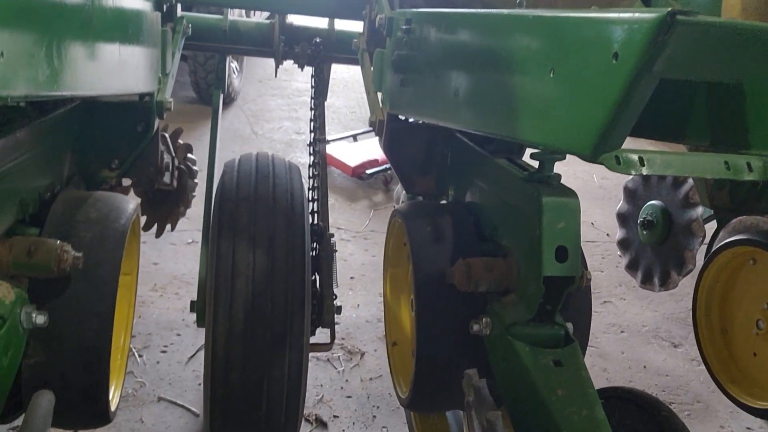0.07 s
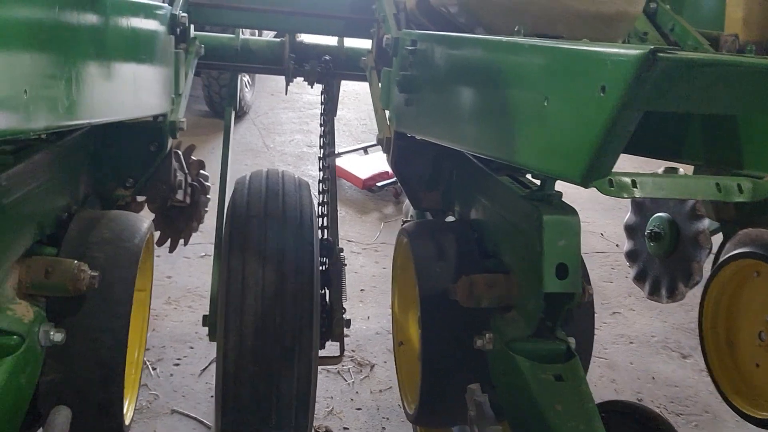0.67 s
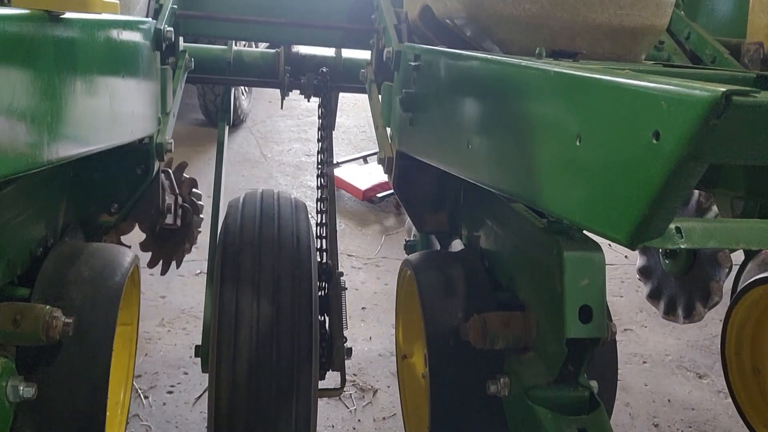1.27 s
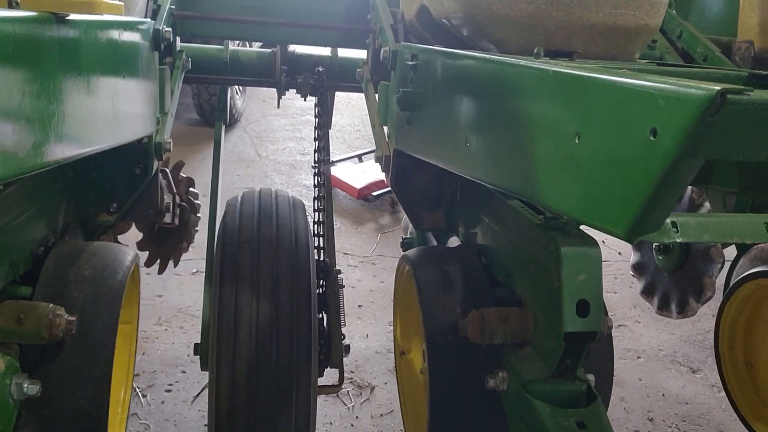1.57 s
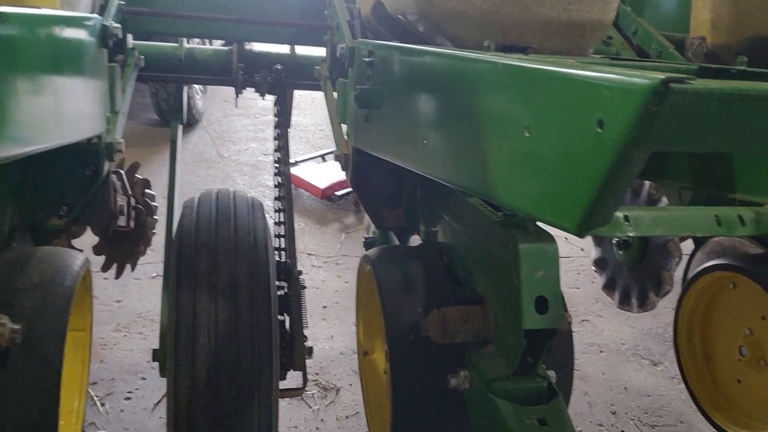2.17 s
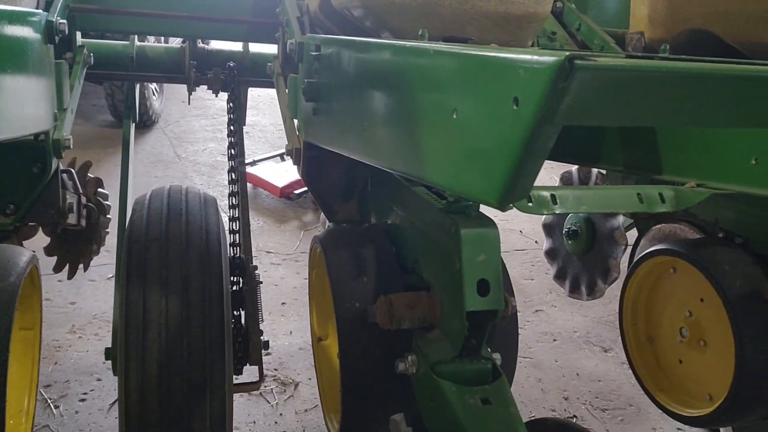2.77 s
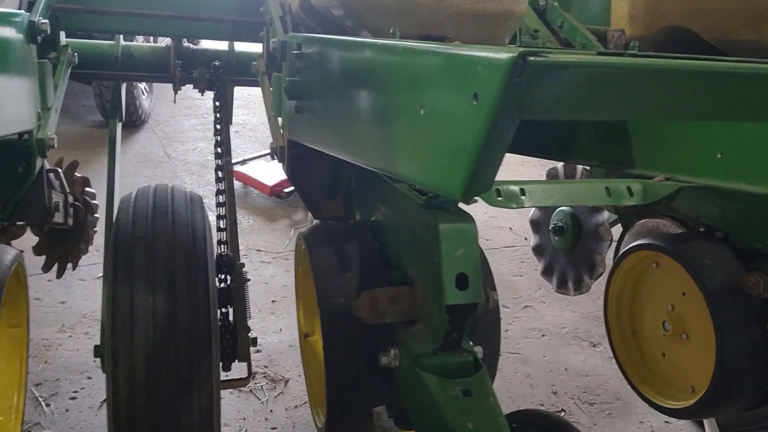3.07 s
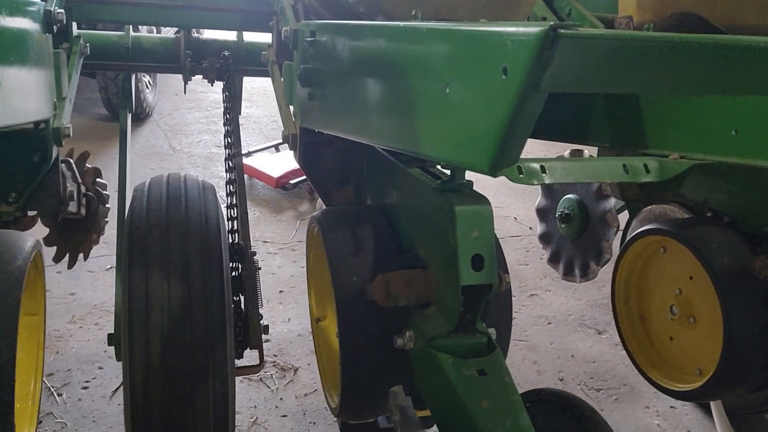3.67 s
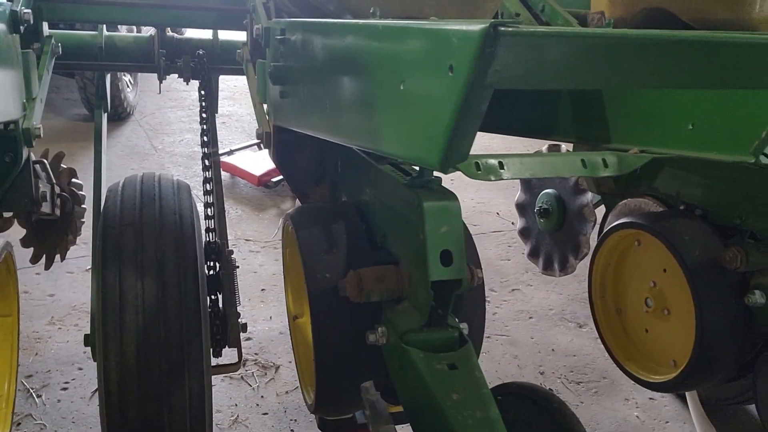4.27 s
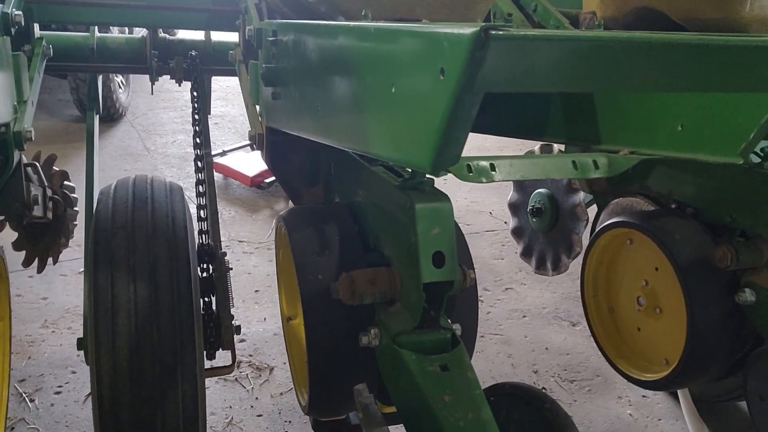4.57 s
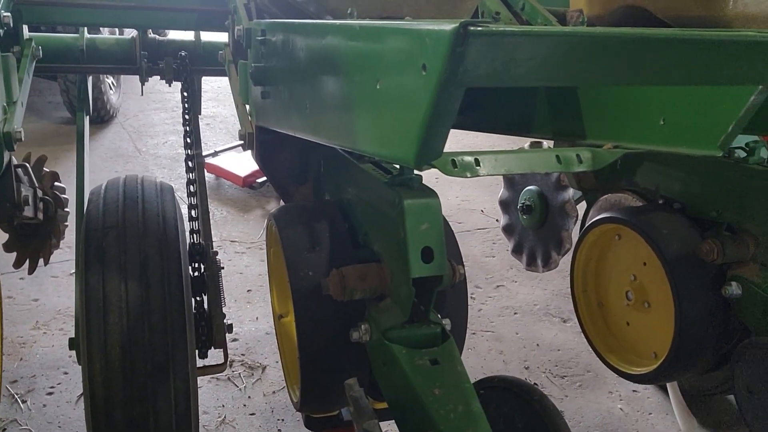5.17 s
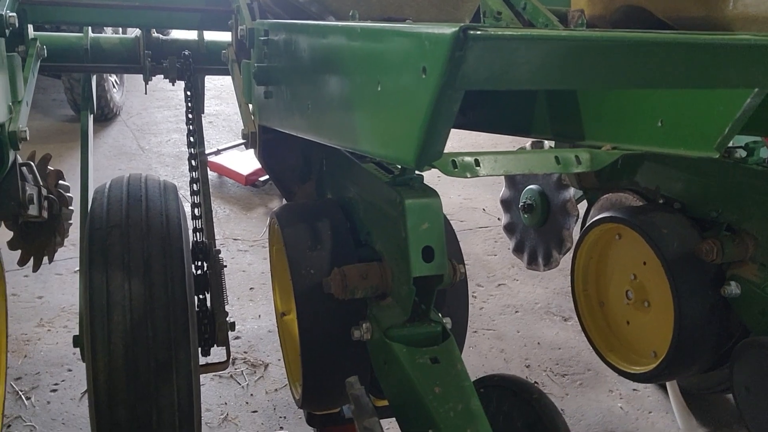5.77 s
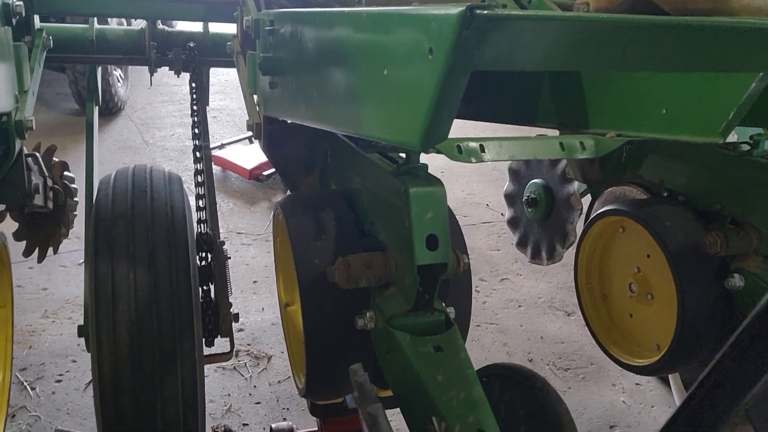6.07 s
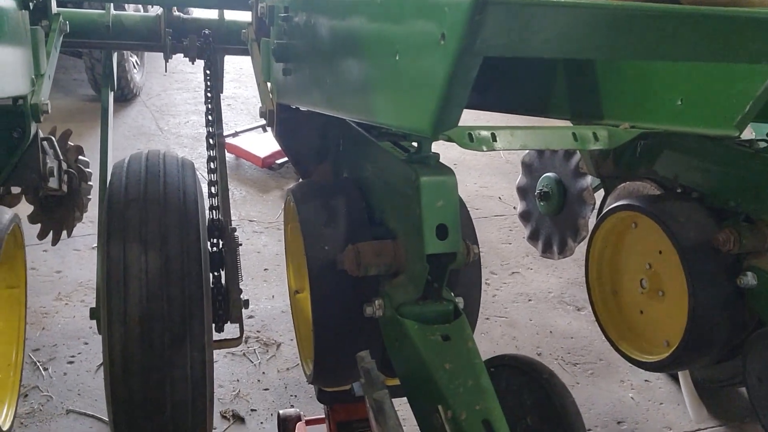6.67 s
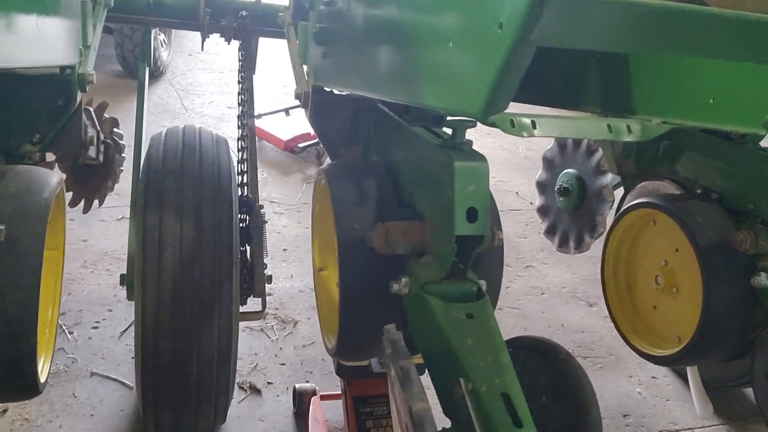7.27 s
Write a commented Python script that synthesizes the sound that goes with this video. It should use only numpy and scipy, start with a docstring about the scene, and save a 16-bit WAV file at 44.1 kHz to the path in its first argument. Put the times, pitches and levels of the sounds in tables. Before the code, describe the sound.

Shrill metal squeaks repeat about once a second among clanks and faint chain clicks, with a low rumble in a large indoor space.

```python
"""Row-crop planter turned over in a shed.

The planter is jacked up and its drive wheel and chain are turned slowly. A dry joint squeaks
by stick-slip about once a second. The steel frame clanks and bumps, discs and loose parts ring,
chain links click, and a grainy, scrape-like noise swells briefly. The large shed echoes, over
a low rumble of distant machinery."""
import sys
import numpy as np
from scipy import signal
from scipy.fft import rfft, irfft, next_fast_len
from scipy.io import wavfile

SR = 44100
rng = np.random.default_rng(int(sys.argv[2]) if len(sys.argv) > 2 else 0)


def dump(signal):
    """Clip the signal to [-1, 1] and save it as 16-bit WAV at the path in sys.argv[1]."""
    limited = np.clip(np.atleast_2d(signal).T, -1, 1)
    pcm = np.round(limited * 32767).astype(np.int16)
    wavfile.write(sys.argv[1], SR, pcm)


N = 322371
TIME_S = np.arange(N) / SR
SIDES = np.array([[1], [-1]])  # left, right

# Machinery spectrum. Each row: frequency in Hz, relative density in dB.
RUMBLE_SPECTRUM = [(21, -28.5), (36, 2.5), (75, 1.5), (107, -2.5), (186, -10), (222, -13), (332, -18.5),
                   (497, -24.5), (536, -22), (1110, -32.5), (1470, -32), (2760, -56), (4580, -58.5),
                   (8610, -68.5), (15000, -70.5)]
# Stereo width of the rumble. Each row: frequency in Hz, side over mid in dB.
RUMBLE_WIDTH = [(100, -16), (180, -14.5), (350, -10), (700, -1.5), (2000, 2), (10000, 1)]
# Motors. Each row: frequency in Hz, relative start level in dB, fade in dB per second, end in seconds.
MOTOR_HUMS = [(101.9, -52, 1.5, 6.5), (130.9, -56.5, -0.14, 7.3)]
# Shed reverberation. Each row: frequency in Hz, T60 in seconds.
SHED_DECAY = [(100, 3.1), (500, 0.42), (2000, 0.59), (5000, 0.38), (10000, 0.56), (16000, 0.093)]
# Hiss, and brief swells of grainy noise. Each row: start in seconds, length in seconds, relative dB.
HISS_SPELLS = [(0.984, 0.813, -75), (4.25, 0.36, -83)]
NOISE_SWELLS = [(3.076, 0.41, -71), (4.241, .31, -56.5), (4.912, 0.597, -66)]
# Spectra of hiss, grainy noise and impact contacts. Each row: frequency in Hz, gain in dB.
HISS_SPECTRUM = [(1500, -18), (4400, 7), (6000, -8), (10000, -5), (12000, -5), (15500, -8)]
GRAIN_SPECTRUM = [(200, -0.5), (550, 5), (1500, -2), (2400, -1), (3500, -6.5), (5000, -10),
                  (7000, -24), (15000, -46.5)]
CLANK_SPECTRUM = [(100, -1.5), (380, -9), (850, 1), (1800, -2.5), (3300, 0), (4900, -1), (7500, -14),
                  (15000, -22.5)]
BUMP_SPECTRUM = [(100, 2.5), (380, 0.5), (850, 11.5), (1600, -1), (3300, -10), (4900, -20), (7500, -37),
                 (15000, -52.5)]
# Chain pins seating. Each row: time in seconds, pitch in Hz, level in dB.
PIN_CLINKS = [(0.38, 3610, -67), (0.587, 3600, -77), (1.236, 3460, -61.5), (3.419, 3260, -72),
              (5.146, 3400, -67), (5.713, 3334, -61), (6.16, 3280, -69.5), (6.878, 3300, -69.5),
              (7.117, 2750, -71.5)]
# Pin modes. Each row: multiple of the pitch, gain in dB, T60 in seconds.
PIN_MODES = [(0.571, -2.5, 0.12), (1, -0.5, 0.12), (1.032, -11, 0.043), (1.6, -14, 0.16),
             (1.719, -28.5, 0.083), (2.2, -17, 0.035)]
# Loose parts. Each row: time in seconds, centre frequency in Hz, level in dB, T60 in seconds.
PART_KNOCKS = [(2.37, 240.3, -43.5, 0.39), (2.370, 745, -33, 0.039), (3.206, 1075, -51.5, 0.1),
               (3.554, 1507, -29.5, 0.036), (4.387, 388, -43, 0.076), (5.266, 1420, -43, 0.11),
               (6.306, 1427, -43.5, 0.085)]
# Frame shudders and blows that ring the discs. Each row: time in seconds, level in dB.
FRAME_SHUDDERS = [(0.65, -33), (0.7, -33), (0.786, -31.5), (4.152, -39)]
DISC_STRIKES = [(0.68, -48), (0.80, -33), (3.556, -47)]
# Disc modes. Each row: frequency in Hz, gain in dB, T60 in seconds.
DISC_MODES = [(540, -6.5, 0.46), (1210, -29.5, 0.87), (1400, -11, 0.14), (1783, -1.5, 0.66),
              (2060, -11.5, .4), (2430, -12, .33), (2820, -20, 0.17), (3750, -18, 0.18), (4240, -29, 0.51),
              (4500, -37, .33), (4770, -10, 0.17), (6340, -22.5, 0.16)]
# Main frame resonances. Each row: frequency in Hz, width in Hz, lift in dB.
FRAME_RESONANCES = [(556, 10, 9.5), (1104, 41, 2.5), (1432, 65, 6.5), (2020, 140, 6), (2283, 160, 5.5),
                    (3140, 23, -1.5), (3850, 72, 4.5), (4330, 26, 1), (4760, 250, 2), (5600, 68, 8.5),
                    (7940, 130, 11.5), (11860, 200, 10)]
# Steel on steel. Each row: time in seconds, relative level in dB, tilt in dB per octave,
# extra bass in dB, chatter T60 in seconds.
STEEL_CLANKS = [(0.677, -28.5, -1.5, -1.5, .035), (0.698, -42, -3, -14, .12), (0.747, -42.5, -3, -3.5, .1),
                (0.789, -31, 1.5, 1.5, 0.0099), (0.796, -32.5, -1.04, -0.5, .06),
                (0.839, -30.5, 1.73, 6, .045), (0.938, -53, -3, 7.5, .18), (3.555, -37.5, -5.5, -21, .05),
                (4.151, -41, -4, -2, .05), (4.161, -40, 2, 3, .025)]
# Drive taking up slack. Each row: time in seconds, relative level in dB, tilt in dB per octave,
# extra bass in dB.
SLACK_BUMPS = [(0.586, -55.5, 1.5, -0.5), (2.14, -54, 2, -7), (2.24, -65, -9, 0.5), (2.367, -42, -2.5, 6.5),
               (2.614, -60, 0, 4), (2.642, -52.5, 1, -3), (2.676, -51.5, 5.5, -2.5), (3.113, -55, -1, -5),
               (3.205, -50.5, -6, -10.5), (3.264, -49, 0.5, -0.5), (3.285, -64.5, 5, 6.5),
               (4.227, -54, -2.5, -5), (4.581, -61, 1, 0.5), (4.986, -58.5, 3.5, 5.5), (5.039, -51, 4, 3.5),
               (5.197, -51.5, 6, 3.5), (5.263, -50, -4.5, -8.5), (6.304, -53.5, -9.5, -24)]
# Squeak overtones as the frame radiates them. Each row: frequency in Hz, relative gain in dB.
OVERTONE_SPECTRUM = [(7200, -19.5), (7800, -14), (9000, -34.5), (10300, -28), (11500, -28), (13500, -33.5),
                     (15500, -31)]
# Dry joint. Each row: start in seconds, length in seconds, first and last pitch in Hz,
# relative level in dB, fade in dB, roughness (0 is smooth).
JOINT_SQUEAKS = [(2.768, 0.22, 5443, 5024, -34.5, 2.5, 0.27), (2.98, 0.04, 4887, 4706, -38, 6, 0.45),
                 (3.153, 0.037, 5490, 5950, -39, -3, 0.43), (3.674, 0.075, 4630, 4480, -55, 10, 0.54),
                 (3.701, 0.095, 4224, 3764, -44, -0.5, 0.5), (3.793, 0.12, 3718, 3603, -40.5, 12.5, 0.03),
                 (4.721, .032, 4660, 4440, -41.5, 15.5, .3), (4.73, 0.035, 4150, 4056, -42.5, 0, 0.42),
                 (4.754, 0.04, 4914, 4733, -27.5, 6, 0.3), (4.792, 0.084, 4557, 4460, -31, -0.5, 0),
                 (4.87, .105, 4435, 4350, -40.5, 7, 0.25), (5.12, 0.042, 5370, 5580, -48, 14, 0.38),
                 (5.708, 0.038, 5120, 4860, -42.5, 9.5, 0.7), (5.748, 0.033, 4890, 4727, -30.5, 6.5, .4),
                 (5.77, 0.18, 4670, 4379, -31, 12.5, 0.2), (5.87, 0.045, 5080, 5150, -61.5, 13, .7),
                 (5.878, 0.073, 3810, 3630, -48, 6.5, 1.01), (5.936, 0.077, 3650, 3578, -45.5, 12.5, 0),
                 (6.883, .1, 5320, 4980, -45.5, 10, 0.23)]


def undb(db):
    """Decibels to gain."""
    return 10 ** (np.asarray(db) / 20)


def unit(x):
    """Scale to rms 1."""
    return x / np.sqrt(np.mean(x ** 2))


def along(points, hz):
    """Interpolate (Hz, value) points in log frequency."""
    point_hz, value = np.transpose(points)
    return np.interp(np.log(np.maximum(hz, 1)), np.log(point_hz), value)


def colour(x, db_at):
    """Filter by a dB gain given as a function of Hz."""
    n = next_fast_len(x.shape[-1])
    gain = undb(db_at(np.fft.rfftfreq(n, 1 / SR)))
    return irfft(rfft(x, n) * gain, n)[..., :x.shape[-1]]


def wander(rate_hz, n):
    """Smooth random motion, spread near 1."""
    at = np.arange(n) * rate_hz / SR
    return np.interp(at, np.arange(n), rng.standard_normal(n)) * np.sqrt(3 / 2)


def swell(t, length_s, rise_s, fall_s):
    """Trapezoid envelope."""
    return np.clip(np.minimum(t / rise_s, (length_s - t) / fall_s), 0, 1)


def pan(left_db):
    """Constant-power stereo gains, left over right."""
    return unit(undb(SIDES * left_db / 2))


def noise_pair(n, apart):
    """Two noises sharing all but the fraction `apart` of their power."""
    return np.sqrt(1 - apart) * rng.standard_normal(n) + np.sqrt(apart) * rng.standard_normal((2, n))


def add(out, start_s, sound):
    """Mix a sound in."""
    i = max(int(start_s * SR), 0)
    out[:, i:i + sound.shape[-1]] += sound[..., :N - i]


def rumble(level_db=-49, throb_hz=19, drone_hz=535, drone_width_hz=22):
    """Distant machinery drones and throbs: bass centred, upper range diffuse."""
    def shape_db(f):
        drone_db = 6 / (1 + (2 * (f - drone_hz) / drone_width_hz) ** 2)
        return along(RUMBLE_SPECTRUM, f) + 1.5 * f / (f + 3000) + drone_db

    mid = colour(rng.standard_normal(N), shape_db)
    side = colour(rng.standard_normal(N), lambda f: shape_db(f) + along(RUMBLE_WIDTH, f))
    air = (mid + side * SIDES) / np.std(mid) * undb(level_db + wander(4.3, N))
    throbbing = colour(air, lambda f: along([(150, -15), (400, -19)], f))
    return air + 0.12 * np.sin(2 * np.pi * throb_hz * TIME_S) * throbbing


def motors(gain_db=-1, waver_db=2, die_s=1.5):
    """Two motors hum, waver and die away."""
    out = np.zeros(N)
    for hz, db, fade_db_per_s, end_s in MOTOR_HUMS:
        phase = 2 * np.pi * np.cumsum(hz + 0.6 * wander(10, N)) / SR
        running = np.clip((end_s - TIME_S) / die_s, 0, 1)
        level_db = db + gain_db - fade_db_per_s * TIME_S + waver_db * wander(4.4, N)
        out += np.sqrt(2) * np.sin(phase) * running * undb(level_db)
    return out


def shed(x, tail_db, near_db, near_s, build_s=0.033):
    """Add quick reflections from nearby panels and the hall's diffuse tail, dull at its end."""
    t, f = TIME_S[:SR], np.fft.rfftfreq(SR, 1 / SR)
    spectrum, tail = rfft(rng.standard_normal((2, SR))), 0
    bands_hz = np.geomspace(100, 16000, 8)
    for hz, weights in zip(bands_hz, np.eye(len(bands_hz))):
        band = irfft(spectrum * along(np.c_[bands_hz, weights], f), SR)
        tail = tail + band * undb(-60 * t / along(SHED_DECAY, hz))
    tail = unit(tail * (1 - np.exp(-t / build_s))) / np.sqrt(SR)
    taps = rng.standard_normal((2, SR)) * (rng.random((2, SR)) < 0.02)
    near = unit(taps * np.exp(-t / near_s) * (t > 0.001)) / np.sqrt(SR)
    echoes = undb(near_db) * signal.fftconvolve(x, near, axes=1)[:, :N]
    echoes += undb(tail_db) * signal.fftconvolve(x.mean(axis=0)[None], tail, axes=1)[:, :N]
    # long waves arrive alike at both ears
    side = colour((echoes[0] - echoes[1]) / 2, lambda f: along([(150, -11), (1200, 2.5)], f))
    return x + echoes.mean(axis=0) + side * SIDES


def hiss(gain_db=-1, fade_s=0.17):
    """Thin hiss lingers after the big clanks."""
    level = sum(undb(db + gain_db) * swell(TIME_S - start_s, length_s, fade_s, fade_s)
                for start_s, length_s, db in HISS_SPELLS)
    noise = colour(noise_pair(N, apart=1), lambda f: along(HISS_SPECTRUM, f))
    return pan(left_db=3) * unit(noise) * level


def frame_lift_db(f):
    """Summed lift of the frame's main resonances."""
    return sum(db / (1 + (2 * (f - hz) / width_hz) ** 2) for hz, width_hz, db in FRAME_RESONANCES)


def grainy_noise(floor_db=-74.5, gain_db=-3, grain_db=4, waver_db=2):
    """Brief swells of grainy, scrape-like midrange noise over a faint floor."""
    white = noise_pair(N, apart=1)
    noise = unit(colour(white, lambda f: along(GRAIN_SPECTRUM, f) + 0.15 * frame_lift_db(f)))
    swells = sum(undb(db) * swell(TIME_S - start_s, length_s, rise_s=0.08, fall_s=0.083)
                 for start_s, length_s, db in NOISE_SWELLS)
    grains = undb(gain_db + grain_db * wander(250, N) + waver_db * wander(19, N))
    return noise * (undb(floor_db) + swells) * grains


def pins(buzz_rad=0.29):
    """Chain pins drop onto their seats and buzz briefly."""
    out, t = np.zeros((2, N)), TIME_S[:SR // 4]
    for start_s, hz, db in PIN_CLINKS:
        for multiple, mode_db, t60_s in PIN_MODES:
            phase = 2 * np.pi * hz * multiple * t + buzz_rad * wander(600, len(t))
            add(out, start_s, pan(left_db=2) * np.sin(phase) * undb(db + mode_db - 60 * t / t60_s))
    return out


def loose_parts(mode_spacing=0.09):
    """Each knocked part rings on three close, heavily damped modes."""
    out, t = np.zeros((2, N)), TIME_S[:SR // 3]
    for start_s, centre_hz, db, t60_s in PART_KNOCKS:
        envelope = undb(db - 60 * t / t60_s)
        for k in (-1, 0, 1):
            hz = centre_hz * (1 + mode_spacing * (k + 0.22 * rng.standard_normal()))
            add(out, start_s, (-0.5) ** abs(k) * np.sin(2 * np.pi * hz * t) * envelope)
    return out


def shudders(nominal_hz=(58, 97), scatter=0.19, rise_s=0.0016, t60_s=0.24):
    """The heavy frame sways on its two lowest modes."""
    out, t = np.zeros((2, N)), TIME_S[:SR]
    for start_s, db in FRAME_SHUDDERS:
        modes_hz = [hz * (1 + scatter * rng.standard_normal()) for hz in nominal_hz]
        sway = sum(np.sin(2 * np.pi * hz * t) for hz in modes_hz)
        add(out, start_s, sway * (1 - np.exp(-t / rise_s)) * undb(db - 60 * t / t60_s))
    return out


def discs():
    """Steel discs ring after heavy blows; mode levels vary a little each time."""
    out, t = np.zeros((2, N)), TIME_S[:SR]
    for start_s, db in DISC_STRIKES:
        for hz, mode_db, t60_s in DISC_MODES:
            envelope = undb(db + mode_db + rng.standard_normal() - 60 * t / t60_s)
            add(out, start_s, pan(left_db=2) * np.sin(2 * np.pi * hz * (start_s + t)) * envelope)
    return out


def frame(x, low_t60_s=0.19, gain_db=-6.5, mode_count=520):
    """The steel frame answers with dense, short-lived modes, the high ones dying first."""
    t = TIME_S[:SR // 5]
    ring = np.zeros((2, len(t)))
    for k, (offset, cycles, size, skew) in enumerate(rng.standard_normal((mode_count, 4))):
        hz = 150 + 15600 * ((k + 1 + 0.3 * offset) / mode_count) ** 1.5
        t60_s = low_t60_s * np.sqrt(2000 / max(hz, 2000))
        ears_rad = SIDES * skew * min(hz / 1500, 0.6)  # short waves reach the ears out of step
        envelope = undb(2 * size - 60 * t / t60_s) * hz ** (1 / 6) / np.sqrt(t60_s)
        ring += np.sin(2 * np.pi * (hz * t + cycles) + ears_rad) * envelope
    ringing = signal.fftconvolve(x, unit(ring) / np.sqrt(len(t)), axes=1)[:, :N]
    return colour(x + ringing, lambda f: gain_db + frame_lift_db(f))


def impact(t, spectrum, tilt_db_per_oct, bass_db, left_db, chatter_t60_s):
    """Parts strike at t = 0 and chatter; a faint dull noise swells just before and fades after."""
    def contact_db(f):
        tilt_db = tilt_db_per_oct * np.log2(np.clip(f, 300, 9000) / 1600)
        shelf_db = bass_db / (1 + (f / 550) ** 4)
        # bass centred, top to the left
        lean_db = along([(700, 0.0056), (2200, left_db), (4000, left_db), (9000, left_db + 6)], f)
        return along(spectrum, f) + tilt_db + shelf_db + SIDES * lean_db / 2

    rise_s, lead_in_t60_s, tail_t60_s, chatter_db = 0.001, 0.098, 0.54, 3
    contact = colour(noise_pair(len(t), apart=0.14), contact_db)
    dull = colour(contact, lambda f: along([(400, 0.5), (2000, -3.5), (9000, -19.5)], f))
    after_s = np.maximum(t, 0)
    attack = 1 - np.exp(-after_s / rise_s)
    strike = attack * undb(-60 * after_s / chatter_t60_s)
    lead_in = undb(-16 - 60 * np.abs(t) / lead_in_t60_s)
    tail = attack * undb(-18 - 60 * after_s / tail_t60_s)
    return (contact * strike + dull * (lead_in + tail)) * undb(chatter_db * wander(506, len(t)))


def blows(gain_db=16, lead_s=0.03):
    """Hard clanks and dull bumps land on the frame."""
    out, t = np.zeros((2, N)), TIME_S[:SR // 2] - lead_s
    for strike_s, db, tilt, bass_db, chatter_t60_s in STEEL_CLANKS:
        clank = impact(t, CLANK_SPECTRUM, tilt, bass_db, left_db=5, chatter_t60_s=chatter_t60_s)
        add(out, strike_s - lead_s, clank * undb(db + gain_db))
    for strike_s, db, tilt, bass_db in SLACK_BUMPS:
        bump = impact(t, BUMP_SPECTRUM, tilt, bass_db, left_db=3, chatter_t60_s=0.036)
        add(out, strike_s - lead_s, bump * undb(db + gain_db))
    return out


def dry_joint(gain_db=-2, flutter_db=5, flicker_db=4, hold_share=0.48, settle_s=0.075):
    """Stick-slip locks on one shrill mode; where grip is poor, pitch and level shake."""
    catch_s, let_go_s, locked_share = 0.023, 0.02, 0.37
    out, n = np.zeros((2, N)), SR // 2
    t = TIME_S[:n]
    for start_s, length_s, first_hz, last_hz, db, fade_db, roughness in JOINT_SQUEAKS:
        age_s = np.minimum(t, length_s)
        # pitch settles as the joint slows
        glide = np.expm1(-age_s / settle_s) / np.expm1(-length_s / settle_s)
        hz = first_hz + (last_hz - first_hz) * glide
        # grip is roughest as it catches and lets go
        slipping = np.exp(-age_s / catch_s) + np.exp((age_s - length_s) / let_go_s)
        rough = roughness * np.minimum(locked_share + slipping, 1)
        jitter = 0.039 * rough ** 2 * wander(800, n)
        waver = 0.0055 * wander(70, n) + 0.0066 * wander(35, n)
        phase = 2 * np.pi * np.cumsum(hz * (1 + jitter + waver)) / SR
        tone = pan(left_db=6) * np.sin(phase)
        for k, trim_db in ((2, 1), (3, -3), (4, -7)):
            overtone_db = along(OVERTONE_SPECTRUM, k * hz) + trim_db + flicker_db * wander(60, n)
            tone += pan(left_db=10) * undb(overtone_db) * np.sin(k * phase) * (k * hz < SR / 2)
        faded = np.maximum(age_s / length_s - hold_share, 0) / (1 - hold_share)
        level_db = db + gain_db - fade_db * faded + flutter_db * rough * wander(170, n)
        grip = swell(t, length_s, rise_s=0.012, fall_s=0.0072)
        add(out, start_s, np.sqrt(2) * tone * grip * undb(level_db))
    return out


def scene():
    """Clanks and squeaks in the shed, over the rumble."""
    steel = frame(blows() + grainy_noise()) + loose_parts() + pins()
    clatter = shed(steel, tail_db=-16, near_db=-11, near_s=0.004)
    squeaks = shed(dry_joint(), tail_db=-17, near_db=-3.5, near_s=0.011)
    return clatter + squeaks + discs() + shudders() + hiss() + rumble() + motors()


def record(dry):
    """Band-limit to 30 Hz - 15.8 kHz."""
    highpass = signal.butter(3, 30, "highpass", fs=SR, output="sos")
    lowpass = signal.ellip(10, 0.2, 70, 15800, fs=SR, output="sos")
    return signal.sosfilt(lowpass, signal.sosfilt(highpass, dry))


dry = scene()
out = record(dry)
dump(out)
```